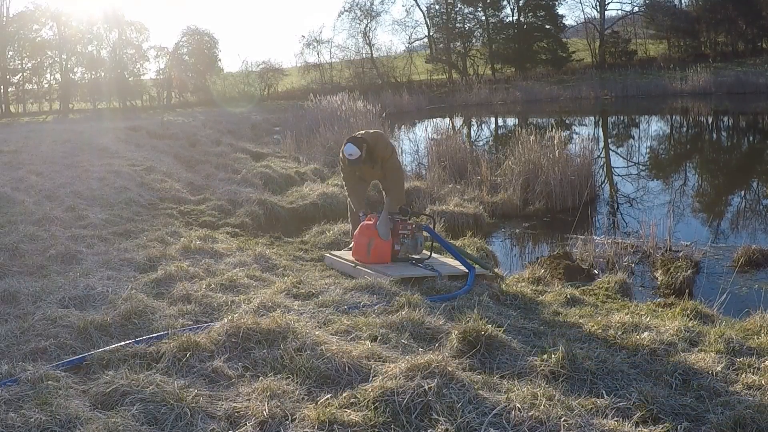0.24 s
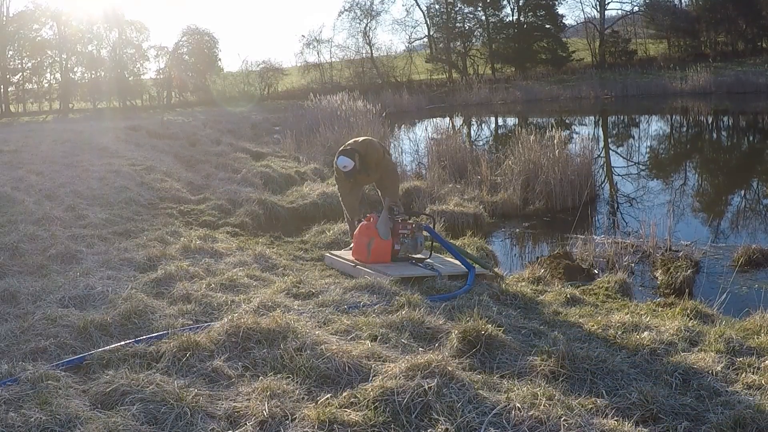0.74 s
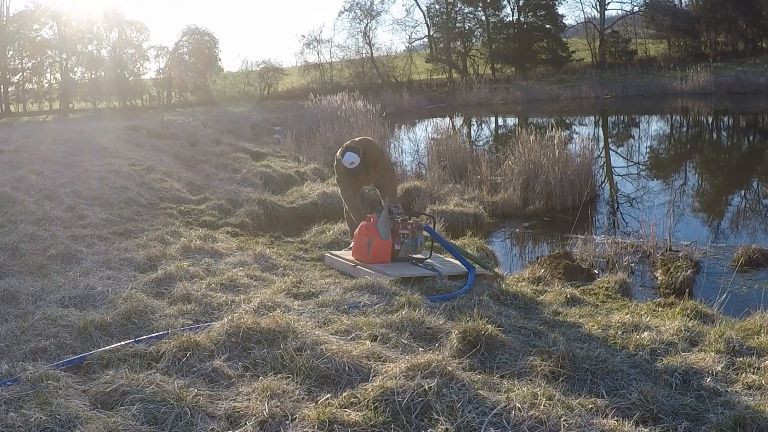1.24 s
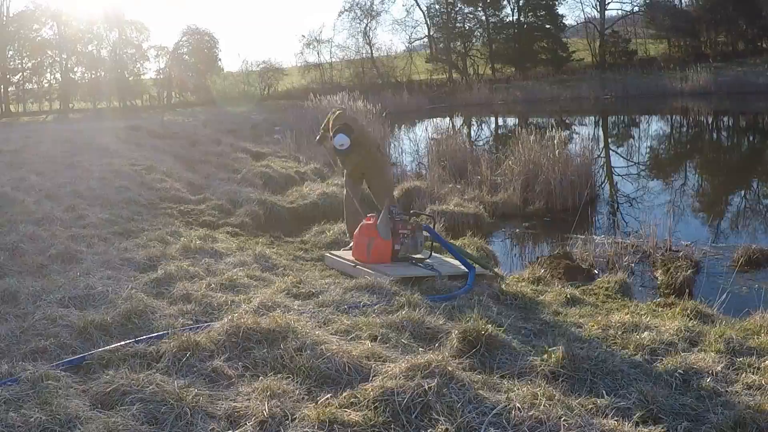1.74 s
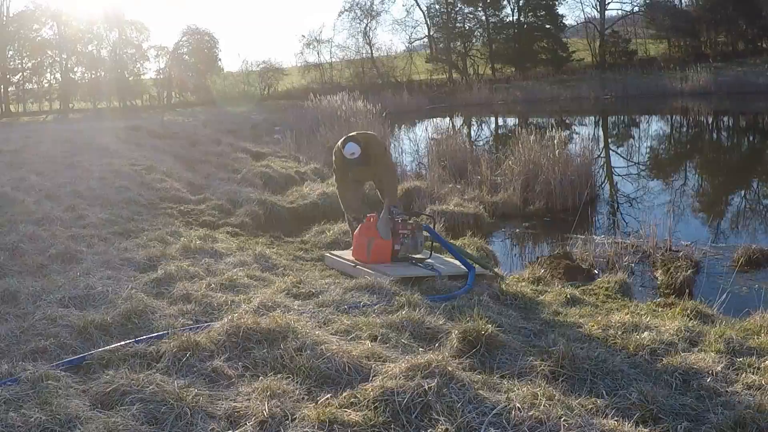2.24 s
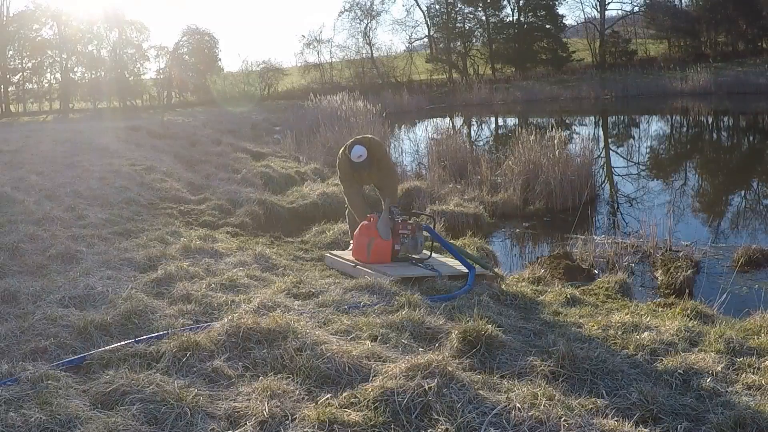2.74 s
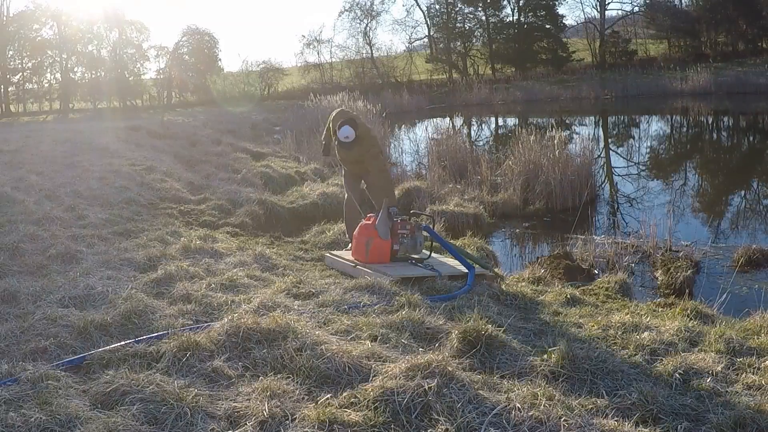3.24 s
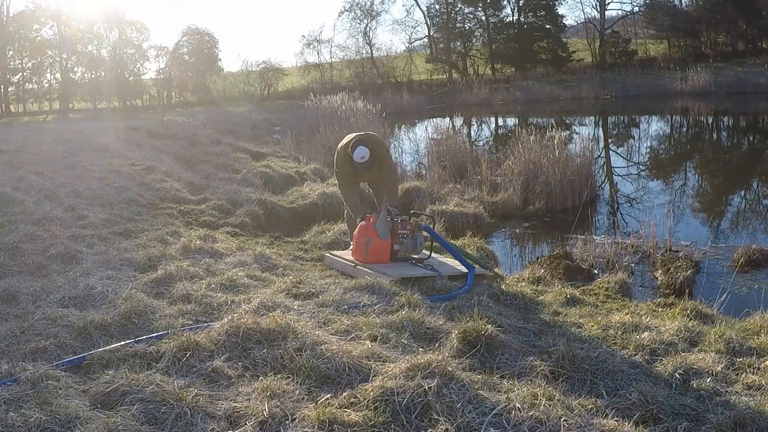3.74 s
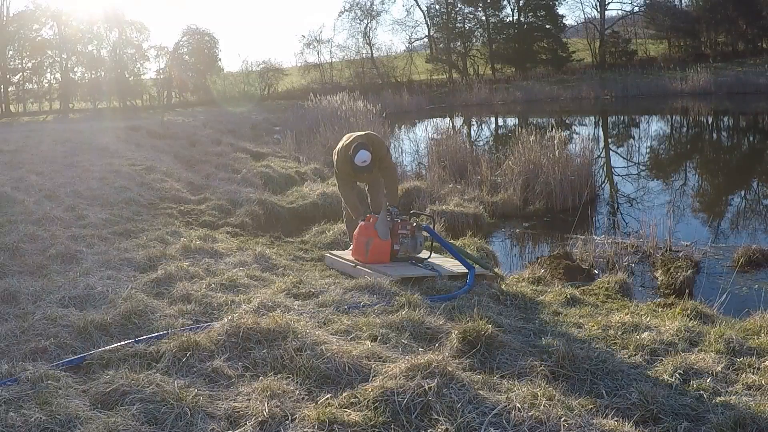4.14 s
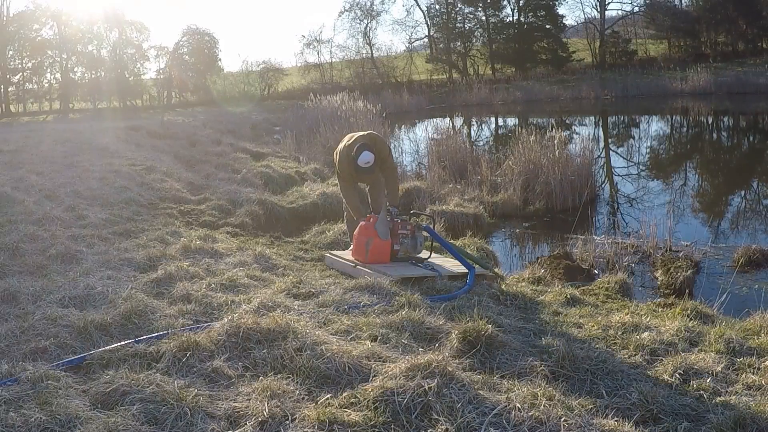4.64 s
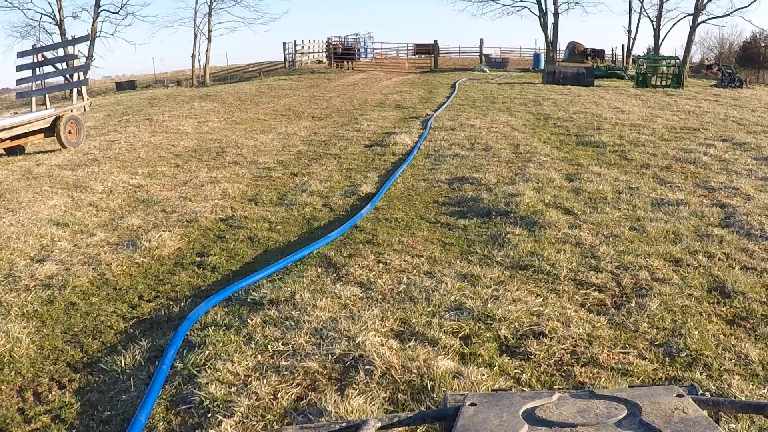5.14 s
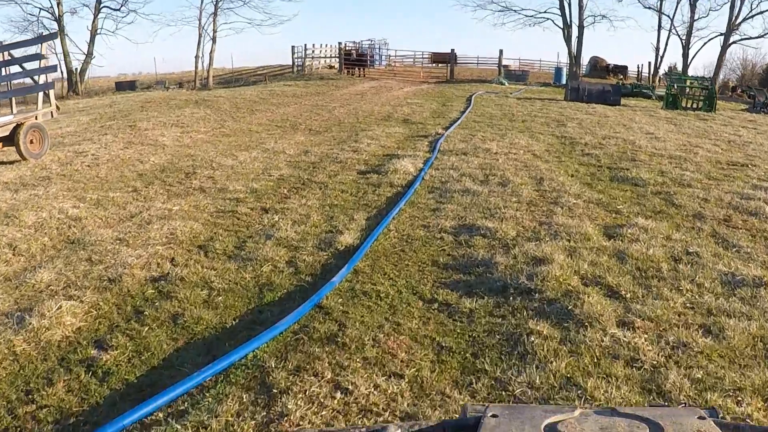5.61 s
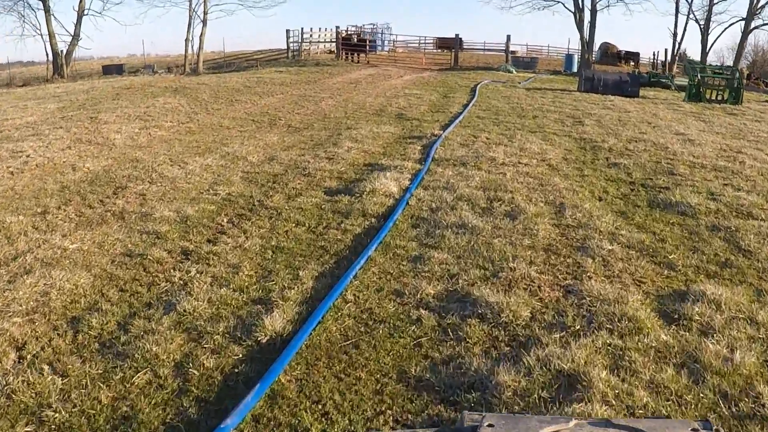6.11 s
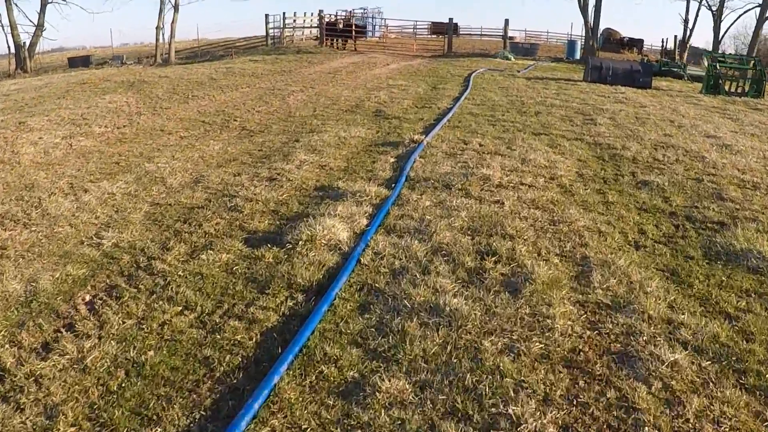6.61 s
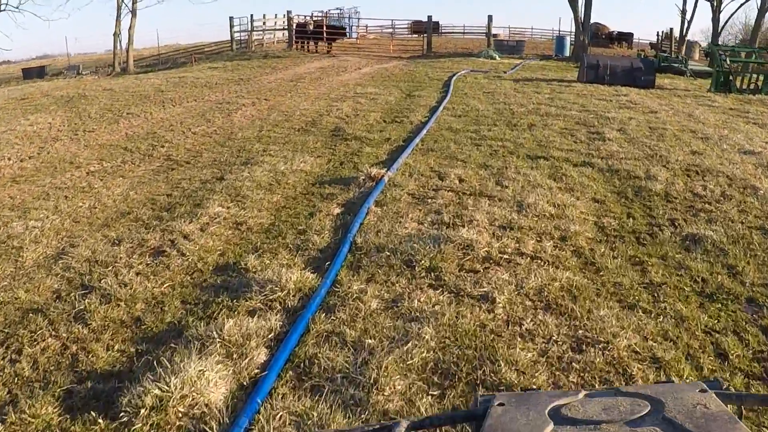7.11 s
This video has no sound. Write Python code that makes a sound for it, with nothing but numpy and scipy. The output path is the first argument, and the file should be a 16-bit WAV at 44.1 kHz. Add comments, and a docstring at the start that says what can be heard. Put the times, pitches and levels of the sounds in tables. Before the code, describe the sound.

Clanking, squeaky rope pulls start a small pump engine amid quiet birdsong; a sudden cut brings the close, buzzing engine and gear whine of a vehicle.

```python
"""A small gasoline pump beside a pond is pulled twice by its rope starter, catches and putters slowly.
The pump is damped muffler pulses, filtered noise for fan and valves, resonant clacks and a squealing rope.
Marsh birds sing around it in swept tones and trills, over a low murmur of filtered noise.
The pond fades and the scene changes to a ride on a utility vehicle: ringing single-cylinder exhaust pulses,
engine clatter made of noise in step with the engine, and gear tones that whine with the ground speed."""
import sys
import numpy as np
from scipy import signal
from scipy.fft import rfft, irfft
from scipy.io import wavfile

SR = 44100
rng = np.random.default_rng(int(sys.argv[2]) if len(sys.argv) > 2 else 0)


def waveform_to_disk(signal):
    """Save audio, clipped to [-1, 1], as 16-bit WAV at the path in sys.argv[1]."""
    frames = np.transpose(np.atleast_2d(signal))
    scaled = np.clip(frames, -1, 1) * 32767
    samples = np.round(scaled).astype(np.int16)
    wavfile.write(sys.argv[1], SR, samples)


N = 325017
TIME = np.arange(N) / SR

# All levels in the tables are relative; the mix trims them further.
# Nearer birds' whistles. Each row: start in seconds, length in seconds, start pitch in Hz, end pitch in Hz,
# level in dB, roughness as a share of flutter (held within 0.01 to 1).
WHISTLES = [(0.049, 0.045, 2800, 2070, -60, 0.1), (.09, 0.06, 2050, 1700, -58, .05),
            (0.1, 0.037, 3900, 3710, -61, .1), (0.46, 0.029, 3670, 3200, -61, 0.3),
            (0.496, 0.024, 2090, 1750, -55, 0.4), (0.147, 0.094, 1470, 1400, -51.5, 0),
            (0.286, 0.041, 2140, 1940, -51.5, 0.3), (0.337, 0.016, 2620, 2130, -44, 0.5),
            (0.538, 0.018, 5500, 5370, -51, 0.5), (0.847, 0.097, 1590, 1530, -52, 0.04),
            (1.025, 0.017, 2510, 2720, -48, 0.6), (1.179, 0.097, 2480, 2455, -44.5, 0.13),
            (1.197, 0.042, 2190, 2220, -46.5, 0), (1.198, 0.067, 6200, 6460, -55, 0.8),
            (2.002, .04, 2320, 2170, -44, 0.3), (2.093, 0.056, 2580, 2560, -40, 0.12),
            (2.157, 0.039, 5160, 5110, -43.5, 0.1), (2.202, 0.037, 2590, 2630, -46, 0.4),
            (2.284, 0.06, 1920, 1960, -50.5, 0.36), (2.335, 0.028, 2450, 2700, -49, .5),
            (2.368, 0.043, 3940, 3660, -45.5, 1.4), (3.99, 0.029, 4900, 4700, -50, 1.1)]
# Blackbird trills. Each row: start in seconds, end in seconds, notes per second, level in dB,
# low note in Hz, high note in Hz, rasp in dB.
TRILLS = [(0.565, 1.19, 55, -54.5, 2986, 5170, 3), (1.31, 1.93, 85.5, -43.5, 2850, 5430, -1),
          (2.41, 2.905, 69.5, -46, 2870, 5230, -2)]
# Upper partials of each trill pulse. Each row: ratio to the low note, level in dB.
TRILL_RASP = [(1.14, -0.5), (1.27, -4)]
# Murmur of open country. Each row: frequency in Hz, level in dB.
AIR_SPECTRUM = [(40, -23.5), (85, -17.5), (105, -40), (125, -7.5), (160, 3.5), (190, 2), (270, 0),
                (394, -6.5), (462, -11.5), (691, -13), (1630, -24.5), (2400, -24.5), (4380, -31),
                (10000, -32), (12500, -38.5), (15000, -60)]
# Reverberation of banks and reeds. Each row: frequency in Hz, 60 dB decay time in seconds.
ECHO_DECAY = [(150, 0.79), (1000, 0.2), (4000, 0.26), (12000, 0.45)]
# Starter and frame clacks. Each row: start in seconds, level in dB, brightness in dB per octave,
# decay in seconds, hollow housing ring in dB, struck part's ring in Hz, its level in dB, board in dB.
CLACKS = [(0.308, -46, -5.5, 0.0027, -15, 1900, 3, -12), (1.281, -45.5, 4, .006, -20, 3540, 12, -12),
          (1.292, -39.5, 0, 0.0073, -19, 5030, 13, -4), (1.66, -36, -0.5, .008, -18, 1810, 3, -11),
          (1.716, -40.5, 4, .0065, -20, 3400, 0, -6), (1.808, -28, 2.5, 0.0097, -22, 2400, 4, -14),
          (1.8148, -20.5, 4, .0035, -20, 2400, -4, -7.5), (1.893, -46, .5, .014, -20, 1600, 6, -6),
          (1.951, -37, 1.5, 0.022, -19.5, 1900, 6, -18), (2.853, -31.5, 4.5, .007, -17.5, 2230, 12, -9),
          (2.876, -19, 1.5, 0.0062, -23, 2290, 8.5, -6), (3.018, -36, 1.5, 0.017, -20, 1600, 4, -8),
          (3.044, -31.5, 2, 0.0088, -20, 2300, 6, -10), (3.055, -27.5, 6, 0.0081, -20, 3200, -6, -7),
          (3.088, -27, 5, .005, -20, 4100, 3, -8), (3.093, -17, 2.5, 0.0092, 1, 2250, 7, -7.5),
          (3.119, -23, 4.5, .004, -12, 1700, 4, -16), (3.1243, -16, 3.5, 0.0045, -24, 2330, 0, -7.5),
          (3.134, -24, 8, 0.0065, -13, 3050, 3, -9), (3.643, -17.5, 2, .01, 11, 2490, 7, -22)]
# Overall colour of the struck frame. Each row: frequency in Hz, level in dB.
FRAME_SPECTRUM = [(120, -2), (200, -51), (363, 1.5), (998, -3.5), (1170, -1), (1780, -2), (2060, -4.5),
                  (2330, -1.5), (2600, -4.5), (3170, -2.5), (4890, -16), (7280, -11), (8260, -25.5),
                  (9380, -21.5), (15000, -42.5)]
# Resonances of the frame. Each row: frequency in Hz, width in Hz, level in dB.
FRAME_MODES = [(1230, 120, -29), (1600, 25, 5.5), (2480, 47, -13), (3420, 100, -11), (3220, 33, -20),
               (3950, 65, 1.5), (6590, 150, -17), (7450, 110, -26)]
# Hollow resonances of the housing. Each row: frequency in Hz, width in Hz, level in dB.
HOUSING_MODES = [(883, 72, -0.5), (1140, 61, 5.5), (1220, 49, 5), (1320, 16, 5), (1715, 45, -3)]
# Board under the pump. Each row: frequency in Hz, level in dB.
BOARD_SPECTRUM = [(170, -12), (260, -3), (340, 1.5), (430, -7.5), (540, -9), (680, -9), (1000, -8)]
# The engine gulps air without firing. Each row: time in seconds, level in dB.
CHUFFS = [(1.0, -11), (1.058, -9.5), (1.297, -11), (1.70, -4.5), (1.722, -5.5), (1.879, 0.5), (1.956, 2.5),
          (1.985, -3), (2.036, -4.5), (2.091, -6.5), (2.898, -4), (3.058, 1), (3.143, -1), (3.197, -3)]
# Colour of those gulps. Each row: frequency in Hz, level in dB.
CHUFF_SPECTRUM = [(115, -27), (140, 3.5), (200, 8.5), (290, -1.5), (345, 0.5), (420, -16), (700, -28)]
# The pump turning over, one list per stretch. Each row: time in seconds, level in dB.
CRANKING = [
    [(1.5, -48), (1.6, -42.5), (1.69, -42), (1.766, -41), (1.854, -49), (2.048, -46.5), (2.2, -56)],
    [(2.9, -69), (3.01, -37.5), (3.06, -34), (3.34, -40.5), (3.86, -43), (5.2, -43.5)],
]
# Pump valves and fan. Each row: frequency in Hz, level in dB.
PUMP_CLATTER_SPECTRUM = [(290, -5.5), (500, 0.5), (718, -7.5), (1220, -1.5), (1710, -2), (2160, -10),
                         (2450, -12.5), (3020, -16.5), (3620, -10.5), (4280, -20.5), (6240, -21.5),
                         (6690, -19), (8240, -30), (9610, -30.5), (14000, -42)]
# Gas rushing from the pump's muffler. Each row: frequency in Hz, level in dB.
GAS_SPECTRUM = [(105, -35), (125, -23), (150, -3), (180, -17), (210, 4), (260, -18), (320, -14), (360, -19),
                (420, 1), (600, -41)]
# Rope squeals as it runs out, one list per squeal. Each row: time in seconds, pitch in Hz, level in dB.
SQUEALS = [
    [(1.552, 1395, -45), (1.572, 1418, -47), (1.592, 1386, -53), (1.608, 1795, -46), (1.63, 1970, -49),
     (1.643, 2186, -39), (1.655, 2310, -51), (1.69, 2540, -50), (1.76, 2610, -54), (1.805, 2510, -44)],
    [(1.662, 1800, -42), (1.695, 1790, -49)],
    [(1.718, 1650, -56), (1.748, 1330, -53)],
    [(2.941, 1720, -35.5), (2.97, 1770, -43), (2.99, 2013, -49), (3.006, 2500, -44.5), (3.035, 2640, -49),
     (3.18, 2800, -46), (3.24, 2800, -52)],
]
# The pump's speed once it has caught. Each row: time in seconds, firings per second.
PUMP_SPEED = [(3.25, 10.472), (3.55, 11.317), (4.0, 11.107), (4.13, 10.876), (5.13, 11.547)]
# Cavity modes of the pump's muffler. Each row: frequency in Hz, level in dB.
MUFFLER_MODES = [(158, 2.5), (230, -8), (315, -6)]
# Stereo image of birds, air and pump clatter. Each row: frequency in Hz, left-right likeness.
POND_LIKENESS = [(60, 0.7), (150, -0.04), (380, -0.41), (940, -0.28), (2360, 0.69), (5920, 0.44),
                 (14800, -0.45)]
# Stereo image of the starter, straight ahead. Each row: frequency in Hz, left-right likeness.
STARTER_LIKENESS = [(200, 0.82), (1000, 0.62), (2300, 0.66), (5000, 0.64), (12000, 0.15)]
# Fade of the pond. Each row: time in seconds, gain in dB.
POND_FADE = [(5.17, 2), (5.205, -1.5), (5.228, -20), (5.25, -100)]
# Entry of the ride. Each row: time in seconds, gain in dB.
RIDE_FADE = [(5.22, -100), (5.24, -18), (5.255, -3), (5.31, 2)]
# The vehicle's engine. Each row: time in seconds, firings per second.
ENGINE_SPEED = [(5.3, 33.43), (5.55, 33.46), (5.8, 33.27), (6.0, 33.28), (6.2, 32.84), (6.45, 33.03),
                (6.7, 33.39), (6.95, 33.78), (7.1, 32.84), (7.36, 31.94)]
# The vehicle's layers. Each row: time in seconds, exhaust in dB, clatter in dB, hiss in dB.
RIDE_LEVELS = [(5.27, -22, -30.5, -52), (5.32, -14.5, -26, -52), (5.41, -11, -23, -49.5),
               (5.66, -12, -21, -41), (6.43, -14.5, -21, -40.5), (6.73, -10.5, -22, -42),
               (7.35, -16.5, -23.5, -43)]
# Ring of pipe and silencer. Each row: frequency in Hz, swell in seconds, delay in seconds, level in dB.
PIPE_MODES = [(278.8, .0046, 0.00095, -2.5), (220.5, 0.0043, 0.00011, -1), (123.6, 0.0062, 0.0018, -6)]
# Level of the lowest engine orders. Each row: time in seconds, level in dB.
BOOM_LEVEL = [(5.27, -25.5), (5.82, -14.5), (6.35, -17.5), (6.51, -15), (7.3, -17)]
# Lowest engine orders. Each row: multiple of the firing rate, level in dB.
LOW_ORDERS = [(1, -7.5), (2, 2.5)]
# Engine clatter. Each row: frequency in Hz, level in dB.
BLOCK_SPECTRUM = [(210, -38), (320, 2), (367, -7.5), (470, -3.5), (540, -3.5), (595, -8.5), (648, -6.5),
                  (779, -11.5), (908, -7), (1180, -10), (1370, -8), (1590, -16), (1840, -14), (2040, -22.5),
                  (2360, -19.5), (3500, -32.5), (4550, -52.5), (7700, -120)]
# Whine of the cam drive. Each row: multiple of the firing rate, level in dB on top of the clatter curve.
CAM_ORDERS = [(14, -19.5), (19, -20), (31, -18.5), (32, -22.5), (42, -17.5)]
# The vehicle's hiss. Each row: frequency in Hz, level in dB.
HISS_SPECTRUM = [(1760, -22.5), (3000, -8), (3390, -3.5), (3630, 0.5), (3850, 4), (4150, -2.5), (5060, -7),
                 (6050, -4), (7950, -15), (9030, -18.5), (12000, -38.5), (15600, -78), (22000, -120)]
# Top of the hiss opening up. Each row: time in seconds, level in dB.
FIZZ_LEVEL = [(5.5, -100), (6.3, -77.5), (6.7, -63), (7.36, -60)]
# Tyres and body. Each row: frequency in Hz, level in dB.
RUMBLE_SPECTRUM = [(20, -11.5), (45, -12.5), (75, 4), (130, 5), (250, 8), (330, -16), (420, -30),
                   (800, -26)]
# Gear mesh, following the ground speed. Each row: time in seconds, frequency in Hz.
MESH_PITCH = [(5.3, 849), (5.6, 869), (5.99, 905), (6.1, 906), (6.5, 936), (6.69, 963), (6.93, 987),
              (7.1, 965), (7.36, 945)]
# Tones of the gear train. Each row: multiple of the mesh, level in dB, share of flutter.
GEAR_TONES = [(1, -2.5, .03), (1.055, -12.5, 0.13), (1.5, -12, .3), (2, -19, .3)]
# Load on the gears. Each row: time in seconds, final drive in dB, mesh in dB.
GEAR_LOAD = [(5.3, -53, -36), (5.58, -39, -31), (6.1, -31.5, -37), (6.4, -35.5, -25), (6.52, -29, -35),
             (6.7, -30.5, -36), (6.87, -28, -32.5), (7.36, -30, -36)]


def amp(db):
    """Decibels to gain."""
    return 10 ** (np.asarray(db) / 20)


def evened(x):
    """Scales to an rms of one."""
    return x / np.sqrt(np.mean(abs(x) ** 2) + 1e-20)


def read(points, hz):
    """Reads a spectrum table on a log-frequency axis."""
    f, value = np.transpose(points)
    return np.interp(np.log(hz + 1), np.log(f), value)


def curves(rows, t=TIME):
    """Each column of a time table at the times t."""
    s, *columns = np.transpose(rows)
    return [np.interp(t, s, c) for c in columns]


def add(mix, s, sound):
    """Mixes a sound in at time s."""
    part = mix[max(round(s * SR), 0):][:len(sound)]
    part += sound[:len(part)]


def noise(size=N):
    """White noise of rms one."""
    return rng.standard_normal(size)


def colour(x, spectrum, tilt_db=0, size=8192):
    """Causal filter of unit energy with the given spectrum, falling steeply beyond its ends."""
    hz = abs(np.fft.fftfreq(size, 1 / SR)) + 1
    below = np.maximum(np.log2(spectrum[0][0] / hz), 0)
    above = np.maximum(np.log2(hz / spectrum[-1][0]), 0)
    db = read(spectrum, hz) - 30 * (below + above) + tilt_db * np.log2(hz / 2000)
    log_gain = np.log(amp(np.maximum(db, -100)))
    # minimum phase: the energy comes as early as it can
    ring = np.fft.ifft(np.exp(signal.hilbert(log_gain).conj())).real[:size // 2]
    return signal.oaconvolve(x, ring / np.linalg.norm(ring))[:len(x)]


def drift(rate, size=N):
    """Smooth random wander, of rms one over the full length, slower than about rate in Hz."""
    hz = np.fft.rfftfreq(N, 1 / SR)
    return evened(irfft(rfft(noise()) * np.exp(-(hz / rate) ** 2), N))[:size]


def fuzz(width_hz, size):
    """Complex flutter of rms one that turns a line into a narrow band."""
    r = np.exp(-np.pi * width_hz / SR)
    return evened(signal.lfilter([1], [1, -2 * r, r * r], noise(size) + 1j * noise(size)))


def wavering(share, width_hz, size):
    """A steady line with a given share of its power in flutter."""
    share = np.clip(share, .01, 1)
    return np.sqrt(1 - share) + np.sqrt(share) * fuzz(width_hz, size)


def tone(hz, flutter=1):
    """A sine along a pitch curve, of rms one when the flutter is."""
    return np.sqrt(2) * (flutter * np.exp(2j * np.pi * np.cumsum(hz) / SR)).real


def strikes(rows):
    """A train of clicks from rows of time in seconds and level in dB."""
    out = np.zeros(N)
    for s, db in rows:
        add(out, s, amp([db]))
    return out


def late(x, s):
    """Delays a sound by s seconds."""
    return np.interp(TIME - s, TIME, x, left=0)


def dying(clicks, decay):
    """An exponential envelope after each click, decay in seconds."""
    return signal.lfilter([1], [1, -np.exp(-1 / (decay * SR))], clicks)


def ringing(x, modes):
    """Sum of resonances from rows of frequency in Hz, width in Hz and level in dB."""
    return sum(amp(db) * signal.lfilter(*signal.iirpeak(hz, hz / max(width, 20), SR), x)
               for hz, width, db in modes)


def low_cut(x):
    """A small machine in the open radiates no deep bass."""
    return signal.sosfiltfilt(signal.butter(8, 119, "high", fs=SR, output="sos"), x)


def surroundings(x):
    """Sparse reflections off banks and reeds, each band dying at its own rate."""
    taps = rng.choice([-1., 1.], SR // 2) * (rng.random(SR // 2) < 3000 / SR)
    hz, t, z = signal.stft(taps, SR, nperseg=256)
    decay = amp(-60 * t / read(ECHO_DECAY, hz)[:, None])
    tail = signal.istft(z * decay, SR, nperseg=256)[1]
    return late(signal.oaconvolve(x, tail / np.linalg.norm(tail))[:N], .008)


def spread(a, b, likeness):
    """Two channels from two similar sounds, as alike at each frequency as the table says."""
    same = np.clip(read(likeness, np.fft.rfftfreq(N, 1 / SR)), -1, 1)
    mid = irfft(rfft(a) * np.sqrt((1 + same) / 2), N)
    side = irfft(rfft(b) * np.sqrt((1 - same) / 2), N)
    return np.array([mid + side, mid - side])


def open_air():
    """The low murmur of open country: coloured noise with a gently wavering level."""
    return amp(-44.5) * colour(noise(), AIR_SPECTRUM) * amp(drift(15))


def whistles():
    """Short bird notes gliding between two pitches, roughened by flutter."""
    out = np.zeros(N)
    for s, length, start_hz, end_hz, db, rough in WHISTLES:
        size = int(length * SR)
        flutter = wavering(rough, 60 + 600 * abs(rough), size)
        note = tone(np.geomspace(start_hz, end_hz, size), flutter)
        add(out, s, amp(db) * note * signal.windows.tukey(size, .4))
    return out


def clacks():
    """Pawls and handle strike the frame: a dense rattle of contacts rings its modes, then shivers on."""
    out, t = np.zeros(N), np.arange(SR // 4) / SR
    for s, db, bright_db, decay, hollow_db, ring_hz, ring_db, board_db in CLACKS:
        rise = .011 * 2 ** (db / 10.5)  # seconds: harder blows rattle up for longer
        since = np.maximum(t - rise - .0033, 0)  # each blow lingers a moment
        force = np.minimum(t / rise, 1) * (np.exp(-since / decay) + amp(-15.5) * np.exp(-since / .02))
        contacts = force * noise(len(t))
        # each blow favours other modes
        modes = [(hz, width, mode_db + 7 * rng.standard_normal()) for hz, width, mode_db in FRAME_MODES]
        frame = .7 * ringing(contacts, modes)
        housing = amp(hollow_db) * ringing(contacts, HOUSING_MODES)
        struck_part = ringing(contacts, [(ring_hz, 220, ring_db)])
        blow = evened(colour(contacts + frame + housing + struck_part, FRAME_SPECTRUM, bright_db))
        # the board under the pump answers later and lower
        board_force = np.minimum(t / .015, 1) * np.exp(-t / .026)
        board = colour(board_force * noise(len(t)), BOARD_SPECTRUM)
        add(out, s, amp(db) * (blow * np.sqrt(np.mean(force ** 2)) + amp(board_db) * board))
    return out


def trills():
    """Even pulses sweep up on a low note and its rasp, with a high note between pulses."""
    out = np.zeros(N)
    for start, end, rate, db, low_hz, high_hz, rasp_db in TRILLS:
        size = int((end - start) * SR)
        t = np.arange(size) / SR
        cycle = (t * rate + .035 * drift(25, size)) % 1
        pulse = np.sin(np.pi * cycle) ** 2
        sweep = 1 + .092 * (cycle - .5)
        low = (.4 + pulse) * tone(low_hz * sweep, wavering(.22, 350, size))
        partials = sum(amp(d) * tone(k * low_hz * sweep ** 2, wavering(.6, 700, size))
                       for k, d in TRILL_RASP)
        rasp = (.35 + pulse) * partials
        high_curve = high_hz * (1 + .04 * np.exp(-t / .12))  # settles down onto its pitch
        high = (1.35 - pulse) * tone(high_curve, wavering(.7, 600, size))
        song = low + amp(rasp_db) * rasp + amp(-4.5) * high
        add(out, start, amp(db) * evened(song) * signal.windows.tukey(size, .07))
    return out


def chuffs():
    """Unfired strokes gulp air: clicks softened into short low breaths."""
    return colour(strikes(CHUFFS), CHUFF_SPECTRUM)


def pump_clatter(fired):
    """Fan and valve noise swells at each firing, and a valve ticks just after it."""
    kicks = strikes(fired)
    level = sum(amp(curves(rows)[0]) * (TIME > rows[0][0]) * (TIME < rows[-1][0]) for rows in CRANKING)
    beat = 1 + .62 * dying(kicks, .02) + .41 * dying(late(kicks, .075), .012)
    rattle = noise() * beat * amp(2.03 * drift(60))
    whirr = amp(-3) * level * colour(rattle, PUMP_CLATTER_SPECTRUM)
    valve = amp(-45) * tone(np.full(N, 3520), fuzz(300, N))
    valve = valve + amp(-51) * tone(np.full(N, 6700), fuzz(800, N))
    ticks = dying(late(kicks, .004), .02) * valve
    muffler_wash = amp(-42) * dying(kicks, .045) * colour(noise(), GAS_SPECTRUM)
    return low_cut(whirr + ticks + muffler_wash)


def rope():
    """The cord squeals through its guide in small jerks, with a harsh overtone as it first bites."""
    out = np.zeros(N)
    for rows in SQUEALS:
        start, length = rows[0][0], max(rows[-1][0] - rows[0][0], .01)
        t = np.arange(0, length, 1 / SR)
        hz, db = curves(rows, start + t)
        hz = hz * (1 + .0097 * drift(125, len(t)))  # the cord's speed wavers
        edges = np.minimum(np.minimum(t, length - t) / .005, 1)
        overtone = amp(-6 - 128 * t) * tone(2.18 * hz, fuzz(490, len(t)))
        squeal = tone(hz, wavering(.3, 300, len(t))) + overtone
        jerks_db = 3.5 * drift(90, len(t))
        add(out, start, edges * amp(db + jerks_db) * squeal)
    return out


def firings():
    """One firing each engine cycle from the catch on: rows of time in seconds and level in dB."""
    catch_s, settle_s = 3.247, .1
    cycles = np.cumsum(curves(PUMP_SPEED)[0] * (TIME >= catch_s)) / SR
    count = np.interp(POND_FADE[0][0], TIME, cycles)
    times = TIME[np.searchsorted(cycles, np.arange(count), side="right")]
    weak_db = -3 * np.exp(-(times - catch_s) / settle_s)  # the first firings are feeble
    return list(zip(times, -7 + weak_db + rng.standard_normal(len(times))))


def muffler_puffs(fired):
    """Each firing swells softly through the damped muffler and rings its cavity modes."""
    t, out = np.arange(SR // 15) / SR, np.zeros(N)
    u = t / .0095
    swell = (u * np.exp(1 - u)) ** 3.5
    since_crest = t - t[swell.argmax()]  # the modes crest together at the top of the swell
    for s, db in fired:
        puff = sum(amp(mode_db + .81 * rng.standard_normal()) * np.cos(2 * np.pi * hz * since_crest)
                   for hz, mode_db in MUFFLER_MODES)
        add(out, s - .0045, amp(db - 26.5) * swell * puff)
    return out


def piping(count):
    """One bird's soft repeated note, which scoops up to its pitch and drops at the end."""
    start_s, every_s, length_s = 4.303, .205, .119
    out, u = np.zeros(N), np.linspace(0, 1, int(length_s * SR))
    arch = 1 - .08 * (1 - u) ** 8 - .03 * u ** 5
    for k in range(count):
        note = tone(2652 * arch * (1 + .004 * drift(40, len(u))))
        add(out, start_s + k * every_s, amp(-48) * note * signal.windows.tukey(len(u), .4))
    return out


def pond(fired):
    """Birds, with their reflections, and the pump's clatter over the open air."""
    song = whistles() + trills() + piping(count=4)
    return amp(-5.5) * song + amp(-10.5) * surroundings(song) + pump_clatter(fired) + open_air()


def starter():
    """Clacks and rope, with the reflections of the bank."""
    near = low_cut(clacks() + rope())
    return near + amp(-10) * surroundings(near)


def pump_exhaust(fired):
    """Puffs and chuffs, with one distinct echo off the bank and scattered reflections on each side."""
    direct = amp(3.5) * muffler_puffs(fired) + amp(-5) * chuffs()
    bank = amp(-10) * late(direct, .02057)
    scattered = amp(-5) * np.array([surroundings(direct), surroundings(direct)])
    return low_cut(direct + bank + scattered)


def engine_turns():
    """The vehicle engine's running count of cycles, slightly uneven; whole numbers are firings."""
    turns = np.cumsum(curves(ENGINE_SPEED)[0]) / SR
    return turns - np.interp(5.3162, TIME, turns) + .003 * drift(15)


def vehicle_exhaust(turns):
    """Each firing sets pipe and silencer ringing for a few cycles, swelling and dying smoothly."""
    fired = np.diff(np.floor(turns), prepend=np.floor(turns[0])) * amp(.34 * drift(25))
    t = np.arange(-SR // 30, SR // 30) / SR
    ring = sum(amp(db) * np.exp(-((t - delay) / swell) ** 2 / 2) * np.cos(2 * np.pi * hz * (t - delay))
               for hz, swell, delay, db in PIPE_MODES)
    return evened(signal.oaconvolve(fired, ring, "same"))


def boom(turns):
    """The lowest engine orders as wavering sines locked to the engine cycle."""
    lag = .335  # cycles
    orders = sum(amp(db + 2.2 * drift(25)) * np.cos(2 * np.pi * k * (turns - lag)) for k, db in LOW_ORDERS)
    return amp(curves(BOOM_LEVEL)[0] - 3.5) * evened(orders)


def engine_clatter(turns, gate):
    """Mechanical noise through the block, partly the same rattle coming round every cycle."""
    knocks = noise(2048)
    repeating = np.interp(turns % 1, np.linspace(0, 1, len(knocks)), knocks)
    rattle = gate * (noise() + .79 * repeating) * amp(.45 * drift(73))
    return evened(colour(rattle, BLOCK_SPECTRUM))


def cam_whine(turns):
    """High engine orders of the cam drive, each wavering in level."""
    return sum(amp(db + 2 * drift(4.3)) * np.sqrt(2) * np.cos(2 * np.pi * k * turns)
               for k, db in CAM_ORDERS)


def gear_whine():
    """Gear tones swell with the load and follow the ground speed; a thin high whine swells and fades early."""
    mesh_hz = curves(MESH_PITCH)[0]
    drive_db, mesh_db = curves(GEAR_LOAD)
    gears = sum(amp(db + drift(3.9)) * tone(k * mesh_hz, wavering(share, 42, N))
                for k, db, share in GEAR_TONES)
    final_drive = tone(.541 * mesh_hz, wavering(.04, 30, N))
    thin_db = -43.5 - 56.5 * abs(TIME - 5.41)  # dB, falling per second either side of its peak
    thin_whine = amp(thin_db) * tone(np.full(N, 2595), wavering(.47, 60, N))
    return amp(drive_db) * final_drive + amp(mesh_db) * gears + thin_whine


def vehicle():
    """One exhaust pulse every engine cycle, with clatter in step, hiss, tyre rumble and gear whine."""
    turns = engine_turns()
    exhaust_db, clatter_db, hiss_db = curves(RIDE_LEVELS)
    # clatter and hiss swell a little as the valves close
    gate = evened(1 + .48 * np.exp(-((turns - .53) % 1) / .13))
    exhaust = amp(exhaust_db - 2) * vehicle_exhaust(turns)
    clatter = amp(clatter_db - 1.5) * engine_clatter(turns, gate)
    cam = amp(clatter_db) * cam_whine(turns)
    hiss = amp(hiss_db - 1.4) * colour(gate * noise(), HISS_SPECTRUM)
    rumble = amp(exhaust_db - 7.5) * colour(noise(), RUMBLE_SPECTRUM)
    fizz_spectrum = [(8000, 2.5), (10000, -2.5), (11500, -9.5), (13800, -7)]  # Hz, dB
    fizz = amp(curves(FIZZ_LEVEL)[0]) * colour(noise(), fizz_spectrum)
    return exhaust + boom(turns) + clatter + cam + hiss + rumble + gear_whine() + fizz


def scene():
    """The pond in stereo fades out; the ride cuts in, dead centre."""
    fired = firings()
    surround = spread(pond(fired), pond(fired), POND_LIKENESS)
    pulls = spread(starter(), starter(), STARTER_LIKENESS)
    outdoors = surround + pulls + pump_exhaust(fired)
    ride = vehicle() * amp(curves(RIDE_FADE)[0]) * (TIME > RIDE_FADE[0][0])
    return outdoors * amp(curves(POND_FADE)[0]) + ride


def record(dry):
    """Peaks round off near full scale; then a low-pass takes off the top of the treble."""
    rounded = dry / (1 + (abs(dry) / .97) ** 8) ** (1 / 8)
    low_pass = signal.firwin(511, 15300, window=("kaiser", 9), fs=SR)  # edge in Hz
    return signal.oaconvolve(rounded, low_pass[None], "same")


dry = scene()
out = record(dry)
waveform_to_disk(out)
```